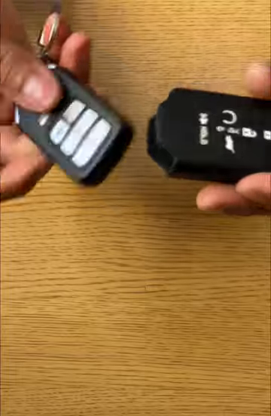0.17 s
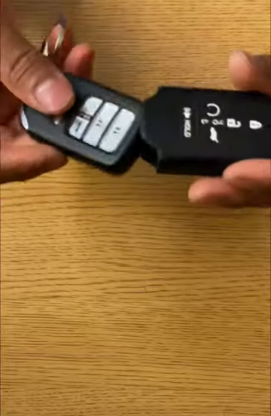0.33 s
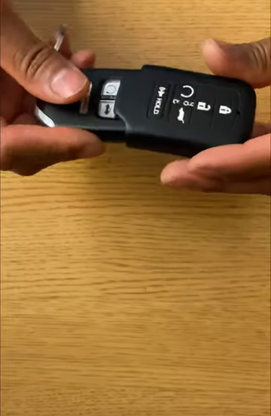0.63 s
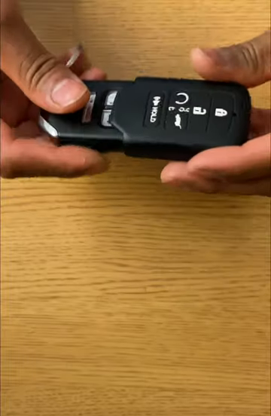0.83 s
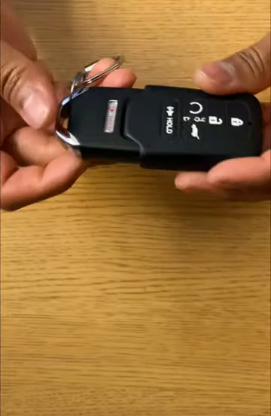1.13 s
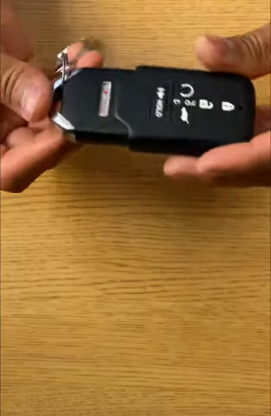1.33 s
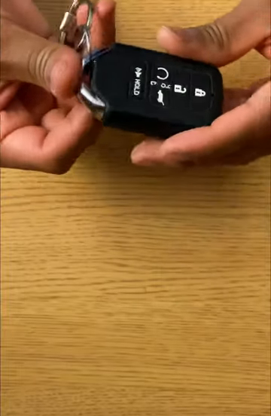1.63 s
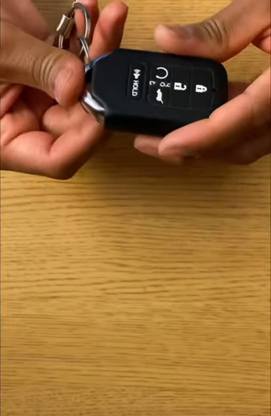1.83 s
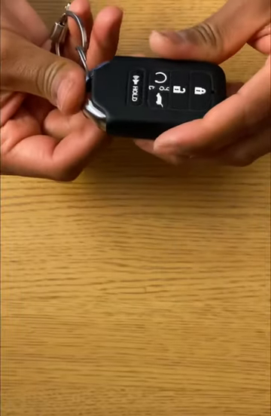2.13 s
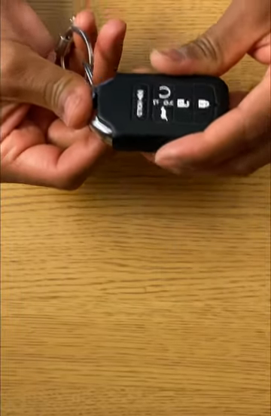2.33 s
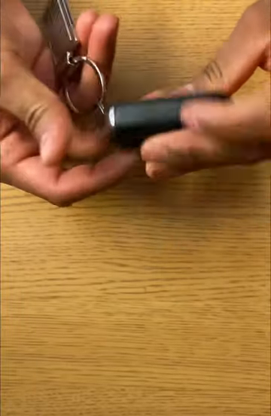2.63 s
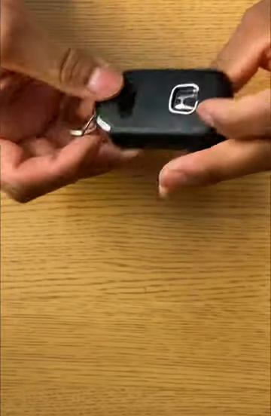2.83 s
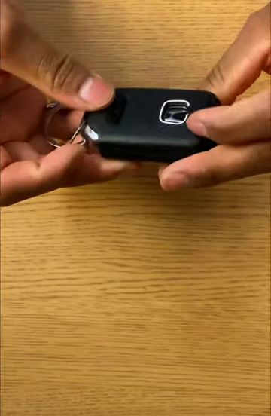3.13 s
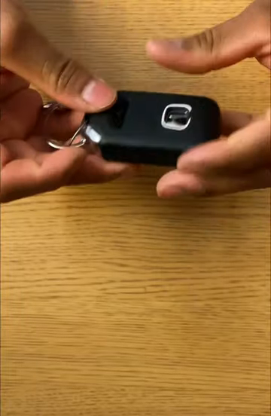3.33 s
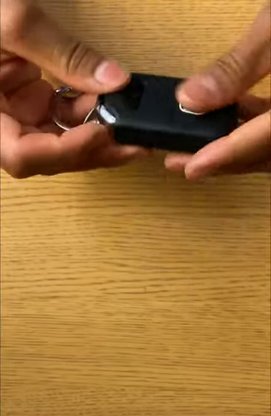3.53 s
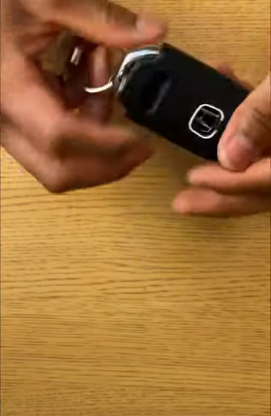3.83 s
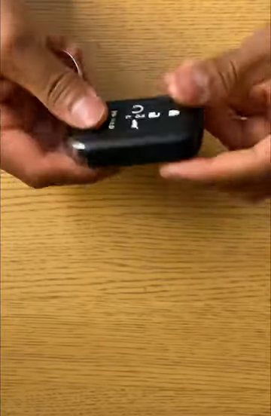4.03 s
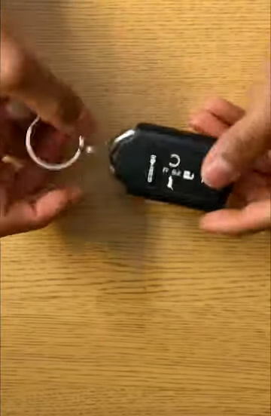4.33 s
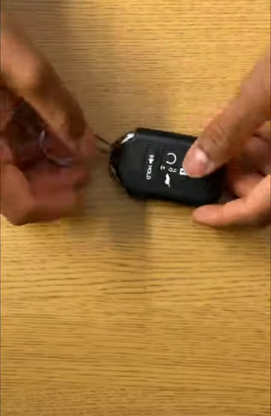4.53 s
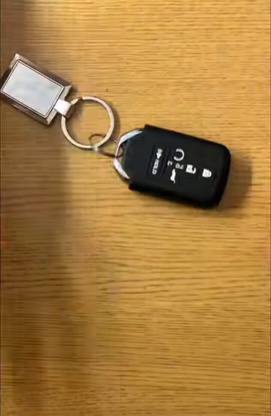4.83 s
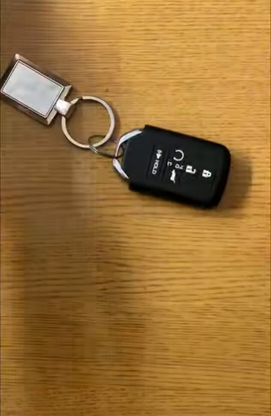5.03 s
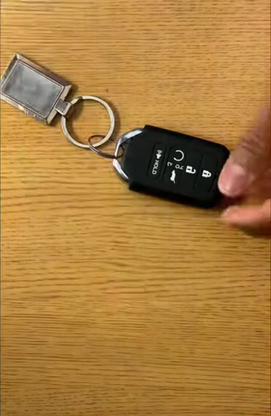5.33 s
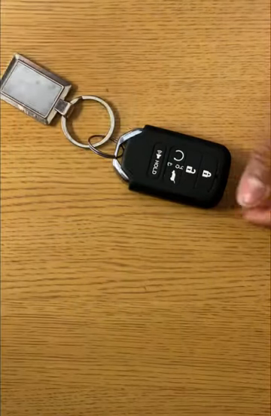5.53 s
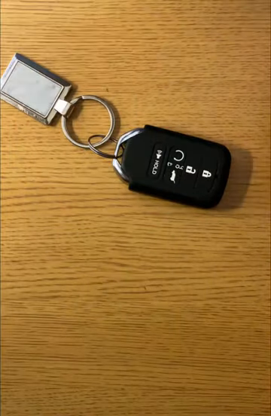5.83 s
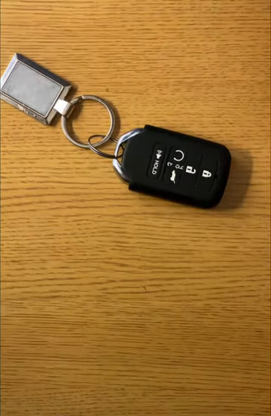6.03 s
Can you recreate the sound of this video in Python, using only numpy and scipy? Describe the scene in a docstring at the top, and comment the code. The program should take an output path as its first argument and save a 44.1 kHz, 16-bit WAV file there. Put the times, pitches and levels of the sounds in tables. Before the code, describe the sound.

Quiet, dry plastic rubbing and sharp clicks come first, with thin steel clinks damped by fingers. A soft thump and stronger clicks come as the case is turned over, then a loud double drop on a wooden tabletop, wood knock mixed with metallic rattle. Muffled table bumps and faint cloth hiss end it. Close stereo microphone, short indoor reverberation, low air hum.

```python
"""A key ring clinks and a plastic case clicks and squeaks as a key fob is pressed into it.
The fob and then its metal tag drop on a wooden table; hands bump the table and a sleeve brushes past.
Blows are shaped noise bursts, with sharp fronts or separate ringing modes; friction is grainy hiss.
Close sounds ring in a small room with a low ventilation hum, heard at two closely spaced microphone ports."""
import sys
import numpy as np
from scipy import signal
from scipy.fft import rfft, irfft, next_fast_len
from scipy.io import wavfile
from scipy.ndimage import uniform_filter1d

SR = 44100
rng = np.random.default_rng(int(sys.argv[2]) if len(sys.argv) > 2 else 0)


def transcribe(signal):
    """Save signal, clipped to [-1, 1], as a 16-bit WAV file at the path in sys.argv[1]."""
    frames = np.atleast_2d(signal).T
    limited = np.clip(frames, -1, 1)
    pcm = np.round(limited * 32767).astype(np.int16)
    wavfile.write(sys.argv[1], SR, pcm)


N = 272978

# modes of the metal tag with its ring: pitch_hz, level_db, t60_s
TAG = [(3230, -4, .05), (3620, -6, .05), (4194, -5, .06), (4450, -4, .05), (5200, -8, .05),
       (5551, -9, .055), (6200, -11, .05), (6679, -9, .06), (7154, 0, .052), (7245, 0, .048),
       (9500, -8, .035), (9800, -9, .035), (14550, -11, .06)]
# a landing or a hand thumps the table: start_s, thud_db, upper_corner_hz, lower_corner_hz, thud_t60_s,
# table_swing_db, swing_hz, swing_length_s, room_throb_db (relative to the swing)
TABLE_THUMPS = [(2.273, -26, 330, 75, .075, -19.5, 109.6, 0.04, -40),
                (2.305, -38.5, 360, 130, 0.088, -34, 104, 0.039, -35),
                (2.327, -39, 300, 75, 0.058, -29.5, 102, 0.036, -40),
                (4.426, -32.5, 422, 168.5, 0.11, -38, 104, 0.032, -31.5),
                (4.442, -29, 388.6, 110.3, 0.15, -17, 100.4, .054, -22.5),
                (4.57, -27.5, 296.5, 74.5, 0.11, -22.5, 113.7, 0.051, -39),
                (4.598, -27, 331.3, 90, 0.13, -11.5, 97.6, .056, -17.5),
                (4.643, -32, 200, 74, .1, -18.5, 100.7, .052, -34),
                (4.992, -46.5, 520, 240, .3, -65, 94.6, .05, -30),
                (5.047, -25.5, 318, 75, 0.14, -25, 86, 0.025, -17.5),
                (5.065, -22.5, 656, 110.7, 0.12, -26, 83, 0.052, -39.5),
                (5.08, -23, 280.7, 74.5, .07, -22.5, 92, .034, -32),
                (5.421, -30, 520, 110, 0.1, -36, 92, 0.042, -19),
                (5.433, -27.5, 303, 68, 0.11, -23.5, 100, .044, -21),
                (5.593, -41.5, 256, 75, 0.16, -41.5, 97.1, 0.039, -20.5),
                (5.851, -30, 190, 58, .12, -44, 88, 0.036, -22.5),
                (5.9, -34.5, 180, 62, 0.11, -26, 97.7, 0.051, -15.5)]


def case_clicks(level_db=-5, focus_db=1.32, note_width_hz=400):
    """Short plastic snaps, each strongest round the pitch of the edge that slips."""
    # snaps and ticks: start_s, level_db (before level_db above), centre_hz, hardness_db_per_octave,
    # note_db (typical boost at the centre)
    snaps = [(0.0582, -41.5, 4100, -1, 9), (0.155, -56.5, 2900, 2, 23), (.3626, -45, 2760, -4, 18),
             (0.3893, -51, 1950, -5, 15), (0.524, -50.5, 2000, -4.5, 12), (0.9766, -56.5, 2520, -3.5, 6),
             (1.0327, -50, 4050, 11, 1), (1.0534, -36, 5860, 0, 11), (1.0582, -33.5, 5980, -1, 12),
             (1.1707, -46, 2300, -3, 12), (1.32, -40, 2260, -3, 7), (1.337, -47, 3120, -2, 14),
             (1.4577, -49, 1940, -8, 14), (1.4807, -45, 3420, 0, -3), (2.2169, -49, 3810, -6.5, 16),
             (2.2663, -47, 970, -3, 7.5), (2.4825, -42.5, 4400, -4.5, -6), (2.630, -48, 3720, -2, 12),
             (2.6481, -37.5, 1280, 2, 6), (2.7113, -25.5, 6030, 0, 7), (2.745, -34.5, 1970, -5.5, -3),
             (2.773, -41, 2960, -0.5, 5), (3.282, -62, 5500, -3, 14), (3.2959, -51, 1460, 4, 8),
             (3.5882, -45.5, 1880, -0.5, 2), (3.707, -46.5, 1780, -6, 5), (3.8559, -33, 1900, -3, 4),
             (3.9635, -27.5, 1980, -1, 10), (4.0497, -37, 1985, 1.5, 8), (4.0614, -32.5, 1510, -5.5, 10),
             (4.1161, -31, 3100, -0.5, 3), (4.2255, -41, 2940, -1.5, 18.5), (5.004, -46.5, 1700, -1, 4),
             (5.0512, -25, 1500, -2, -1), (5.066, -33.5, 1705, -2, -4), (5.074, -29.5, 1260, -1.5, 12),
             (5.4118, -33.5, 1190, -6, 5), (5.422, -35, 1200, -5.5, 8), (5.852, -40.5, 3050, -2.5, 2),
             (6.0361, -36, 2136, -4.5, 6)]
    # dense resonances of the case: pitch_hz, level_db
    body = [(200, -23.5), (600, -5), (1200, -3), (2000, -11), (3000, -3), (4500, -6), (6500, -5),
            (8500, -12), (11000, -4.5), (15000, -19)]
    # damped resonances that stand out of it: pitch_hz, width_hz, typical_level_db
    body_peaks = [(1142, 150, -4), (1530, 234, 6), (1973, 240, 11.5), (2443, 710, 3.5), (2887, 130, 3.5),
                  (3910, 140, 7), (5500, 1300, 1)]
    t60_at_2k_s, damping = 0.034, 0.1  # higher edges die sooner, by this power of their pitch
    out = np.zeros((2, N))
    for s, db, centre, hard, note_db in snaps + faint_ticks():

        def colour(hz):
            away = octaves(hz, centre)
            plastic = read(body, hz) + peaks(body_peaks, hz)
            note = peaks([(centre, note_width_hz, note_db)], hz)
            return plastic + note + hard * away - focus_db * away ** 2

        t60 = t60_at_2k_s * (2000 / centre) ** damping
        add(out, s, amp(db + level_db) * snap(colour, t60, rise=0.00088, front_db=-4.5))
    return out


def faint_ticks(ticks_per_s=2.4, level_db=-54, scatter_db=-2, middle_hz=2330, spread_octaves=0.45):
    """Faint ticks of the case at random times, as rows like those of the snaps."""
    # spans of faint ticks: start_s, end_s (a span that ends before it starts gives none)
    spans = [(0.103, 1.93), (2.5, 2.3), (3.5, 4.4)]
    rows = []
    for start, end in spans:
        length = end - start
        for when, size, pitch in rng.random((round(length * ticks_per_s), 3)):
            db = level_db + scatter_db * (2 * size - 1)
            centre = middle_hz * 2 ** (spread_octaves * (2 * pitch - 1))
            rows.append((start + length * when, db, centre, 0, 8))
    return rows


def sliding(squeak_db=0, rub_db=4, slips_per_s=900, slip_scatter_db=3, squeak_width_hz=300):
    """Each push rubs the case, and a run of tiny slips rings one resonance that moves as the fob goes deeper."""
    # strokes of the fob: hardest_s, swell_s, ease_s, squeak_db, rub_db (before rub_db above),
    # first_pitch_hz, last_pitch_hz
    pushes = [(0.444, .04, 0.037, -64, -81, 2140, 1770), (.505, 0.023, 0.027, -65, -73, 1850, 1600),
              (.55, 0.029, 0.16, -74, -81, 1900, 1700), (0.884, 0.097, 0.066, -71, -77, 1700, 2020),
              (1.05, 0.029, 0.15, -86, -70, 2028, 2000), (1.22, .14, 0.66, -85, -74, 2200, 2190),
              (1.395, 0.1, 0.032, -67, -71.5, 2070, 1900), (1.462, 0.046, 0.085, -67, -63, 2180, 1460)]
    # hiss of the rubbing case: pitch_hz, level_db
    slide_tone = [(700, 11), (1400, 3.5), (2000, 13.5), (2600, 3.5), (4000, 8), (7000, -8), (11000, -15)]
    out, t = np.zeros((2, N)), np.arange(SR) / SR
    for top, swell, ease, db, hiss_db, first_hz, last_hz in pushes:
        slip_now = rng.random(SR) < slips_per_s / SR
        slips = slip_now * amp(slip_scatter_db * np.clip(rng.standard_normal(SR), -2, 2))
        # a low-pass in a frame that turns with the pitch acts as a gliding resonance
        glide_hz = np.interp(t, [0, swell + ease], [first_hz, last_hz])
        turn = np.exp(2j * np.pi * np.cumsum(glide_hz) / SR)
        low_pass = signal.butter(2, squeak_width_hz / 2, fs=SR)
        squeak = unit((turn * signal.lfilter(*low_pass, slips / turn)).real)
        scrape = rub(slide_tone, 0, grain_db=1.5, patchy_db=2.5)
        both = amp(db + squeak_db) * squeak + amp(hiss_db + rub_db) * scrape
        add(out, top - swell, stroke(swell, ease, edge_db=-12) * both)
    return out


def ring_clinks(level_db=-4, ring_db=-33, note_db=7, note_width_hz=450):
    """Bright steel ticks, each with its own note and a faint ring, damped by the fingers."""
    # the key ring touches the tag or the fob: start_s, level_db (before level_db above),
    # hardness_db_per_octave, strongest_pitch_hz
    touches = [(0.018, -41.5, 4.5, 7350), (0.058, -36.5, 2.5, 7030), (0.731, -61, 7, 6640),
               (1.054, -28, 24, 7900), (1.435, -46, 2, 6860), (1.63, -59, 1, 7160), (2.498, -36.5, 6, 7200),
               (2.531, -55, -1.5, 12000), (2.665, -49, 2, 7150), (2.687, -42, 6, 6750),
               (2.7331, -33.5, 4, 7900), (2.956, -57.5, 3, 6150), (3.506, -44, 8, 7600),
               (3.7717, -31, 3, 7090), (3.818, -53, -7.5, 5650), (3.9603, -39, 1, 6200),
               (3.9643, -27, 10.5, 6340), (4.02, -53.5, -6, 7340), (4.1062, -39.5, 4.5, 6520),
               (4.263, -52.5, -0.5, 7090), (4.27, -42, -0.5, 7220), (4.309, -43.5, 1, 14540),
               (4.372, -47.5, -3.5, 6280), (4.438, -35, 3, 11020), (4.456, -37, 9.5, 14130),
               (4.536, -26, -3, 9350), (4.799, -37.5, -7, 6230), (4.831, -39.5, -6, 8200),
               (4.883, -57, -1.5, 9500), (4.903, -46, -5, 6180), (4.911, -47, -9, 6840),
               (4.938, -59, 0.5, 7480), (5.031, -40, -2.5, 8340)]
    out = np.zeros((2, N))
    for s, db, hard, note_hz in touches:

        def colour(hz):
            note = peaks([(note_hz, note_width_hz, note_db)], hz)
            return steel(hz, humps=0.41) + hard * octaves(hz, 7000) + note

        tick = snap(colour, t60=0.033, rise=0.00016, front_db=-5.5)
        tag_ring = ring(TAG, scatter_db=1.5, detune=0.046)
        add(out, s, amp(db + level_db) * (tick + amp(ring_db) * tag_ring))
    return out


def landings(level_db=4.5, clash_db=-19.0, tag_db=-12, tag_room_db=-3, focus_db=9, note_db=6,
             note_width_hz=550, chatter_db=-16, chatter_s=0.024, loss_db=1.0, count=6):
    """Each landing cracks, rings table top and tag, then rebounds; gives direct sound and room share."""
    # fob and tag land: start_s, level_db (before level_db above), hardness_db_per_octave, edge_note_hz,
    # tag_db, table_ring_db, room_share_db (these three relative to the landing, before trims)
    drops = [(4.4235, -15.5, -2.5, 2900, -33.5, -16, 4), (4.437, -27, 0, 2468, -22.5, -17.5, 8.5),
             (4.4857, -32, -0.5, 3100, -31.5, -12.5, 7.5), (4.5599, -11, -1, 3600, -7, -14.5, -4.5),
             (4.5886, -18, -4.5, 3300, 1, -22, -0.5), (4.5953, -11.5, 1, 4400, -2.5, -13, -4),
             (4.5992, -19.5, 2, 5200, 4.5, -14, -4.5), (4.6132, -17.5, 2, 3150, -5, -24.5, -5.5),
             (4.619, -15.5, 3, 4350, -1.5, -16.5, -6.5), (4.635, -23.5, -1.5, 3300, 2.5, -14, -8),
             (4.644, -27.5, -1, 4300, -6, -17.5, -2), (4.667, -36, -3.5, 2500, -8.5, -17, -2)]
    # dense resonances of the wood: pitch_hz, level_db
    wood_tone = [(150, -27.5), (300, -12), (600, -1.5), (900, -5), (1400, -1), (2100, 4.5), (3200, 0.5),
                 (4400, -4.5), (5000, -5.5), (6500, -9.5), (8500, -19), (11000, -18), (13000, -29.5),
                 (15000, -34)]
    # separate modes of the table top: pitch_hz, level_db, t60_s
    top_modes = [(307.7, -5, 0.089), (320, -0.5, 0.11), (450, -3.5, .1), (604, -6, 0.15), (840, -19, 0.27),
                 (1143, -2.5, .035), (1201, 3.5, 0.044), (1636, -2, 0.083), (1966, -5.5, 0.055),
                 (2100, 2, 0.031), (2670, -1, 0.072), (2920, -4.5, 0.036), (3127, 0, 0.063)]
    out, sent = np.zeros((2, 2, N))
    for s, db, hard, note_hz, steel_db, top_db, room_db in drops:

        def colour(hz):
            note = peaks([(note_hz, note_width_hz, note_db)], hz)
            return read(wood_tone, hz) + hard * octaves(hz, 2000) + note

        def clash_colour(hz):
            return steel(hz, humps=0.9) - focus_db * octaves(hz, 5600) ** 2

        crack = burst(colour, t60=0.024, rise=0.00089)
        wood = crack + amp(top_db) * ring(top_modes, scatter_db=-0.5, rattle_db=0.5)
        clash = burst(clash_colour, t60=0.01, rise=0.0011)
        tag = amp(clash_db) * clash + amp(tag_db) * ring(TAG, scatter_db=2.5)
        add(out, s, amp(db + level_db) * (wood + amp(steel_db) * tag))
        add(sent, s, amp(db + level_db + room_db) * (wood + amp(steel_db + tag_room_db) * tag))
        # small rebounds at random gaps, each weaker by loss_db
        delays = np.cumsum(chatter_s * rng.uniform(0.18, 1, count))
        for k, delay in enumerate(delays):
            rebound = burst(colour, t60=0.013, rise=0.00052)
            add(out, s + delay, amp(db + chatter_db - k * loss_db) * rebound)
    return out, sent


def bumps(slope=7.34, push_db=-5, shudder_db=-2):
    """A soft contact pushes and shakes the table between two corner frequencies; then the weight settles."""
    yield_s = 0.003  # flesh gives way before the push arrives
    settle_s, settle_db, settle_hz = 0.016, 2, 163  # the weight follows the first contact, duller
    out = np.zeros((2, N))
    for s, db, first_corner, low_hz, t60, *_ in TABLE_THUMPS:
        for delay, extra_db, corner in [(0, 0, first_corner), (settle_s, settle_db, settle_hz)]:

            def colour(hz):
                upper = 1 + (hz / corner) ** slope
                lower = 1 + (low_hz / (hz + 1)) ** 10
                return -10 * np.log10(upper * lower)

            shudder = burst(colour, t60, rise=0.0025, spread=0.14)
            push = np.linalg.norm(shudder[0]) * pulse(colour)
            add(out, s + delay, amp(db + extra_db + shudder_db) * shudder)
            add(out, s + delay + yield_s, amp(db + extra_db + push_db) * push)
    return out


def booms(low_hz=92, beat_hz=15.0, t60=1.21, lead_s=0.0068):
    """The table's lowest swing swells and fades, leaving two room modes that beat as they die."""
    out = np.zeros((2, N))
    age = np.arange(SR) / SR
    pair = np.sin(2 * np.pi * low_hz * age) - np.sin(2 * np.pi * (low_hz + beat_hz) * age)
    throb = pair * np.exp(-np.log(1000) * age / t60)
    for s, *_, db, hz, swing_s, room_db in TABLE_THUMPS:
        start = s - lead_s  # the swing starts just ahead of the thud
        t = np.arange(int(swing_s * SR)) / SR
        swing = np.sin(np.pi * t / swing_s) ** 2 * np.sin(2 * np.pi * hz * t)
        add(out, start, amp(db) * swing)
        add(out, start + swing_s / 2, amp(db + room_db) * throb)
    return out


def sleeve(level_db=6.5):
    """Cloth brushes past in overlapping sweeps of grainy hiss."""
    # fastest_s, swell_s, ease_s, level_db (before level_db above), brightness_db_per_octave
    sweeps = [(5.381, 0.13, 0.19, -66.5, 4), (5.51, 0.097, 0.38, -66, 2.5), (5.82, 0.13, 0.34, -65, 5),
              (5.889, .07, 0.16, -55, -3), (6.05, 0.026, 0.13, -60, 0)]
    # hiss of the cloth: pitch_hz, level_db
    cloth_tone = [(500, 10.5), (1500, 0), (2900, 0), (4000, -3.5), (4800, -0.5), (7500, -11.5),
                  (10000, -18.5), (15000, -21)]
    out = np.zeros((2, N))
    for top, swell, ease, db, bright in sweeps:
        brush = rub(cloth_tone, bright, grain_db=-0.5, patchy_db=2.0)
        add(out, top - swell, amp(db + level_db) * stroke(swell, ease, edge_db=-16) * brush)
    return out


def changing_room(x, turn_s=0.41, count=3):
    """Crossfades between several random diffuse tails, so that no single tail colours every sound."""
    angle = np.pi * np.arange(N) / SR / turn_s
    gain = np.sqrt(2 / count)  # keeps the summed power steady
    return sum(room(x * gain * np.cos(angle + np.pi * k / count)) for k in range(count))


def room(x, gap_s=0.001, build_s=0.00053):
    """A diffuse tail after a short gap, each band dying at its own speed."""
    # decay of the room: pitch_hz, t60_s
    decay = [(100, 0.78), (300, 0.21), (700, 0.4), (2000, 0.51), (5000, 0.4), (8000, 0.3), (15000, 0.34)]
    # strength of the tail: pitch_hz, level_db
    strength = [(100, -5.5), (300, -5), (700, 0), (1200, -5), (2000, -7.5), (5000, -9), (9000, -8),
                (15000, -21.5)]
    hz, t, z = signal.stft(noise(np.zeros_like, SR), SR, nperseg=256)
    t60 = read(decay, hz)[:, None]
    even_energy = np.sqrt(2 * np.log(1000) / (t60 * SR))  # long and short decays carry the same energy
    z = z * np.exp(-np.log(1000) * t / t60) * amp(read(strength, hz))[:, None] * even_energy
    tail = signal.istft(z, SR, nperseg=256)[1]
    tail = tail * np.clip((np.arange(tail.shape[1]) / SR - gap_s) / build_s, 0, 1)
    return signal.fftconvolve(x.mean(0)[None], tail, axes=1)[:, :N]


def ventilation(air_db=-54, waver=1.0):
    """A steady rush of air with motor lines whose phase wavers by about waver radians."""
    # rush of air: pitch_hz, level_db (relative)
    air_tone = [(25, -15.5), (45, -10), (65, 0), (110, -8), (150, -9), (250, -16.5), (450, -19), (700, -32),
                (1200, -39.5), (2300, -49.5), (3400, -38.5), (4800, -56), (7200, -56), (16000, -66)]
    # motor lines: pitch_hz, level_db
    motor_lines = [(60, -56), (66, -65), (118.4, -60), (241, -71), (398.4, -74.5), (468.3, -73.5)]
    t = np.arange(N) / SR
    knots = np.linspace(0, N / SR, 30)
    hum = np.zeros(N)
    for hz, db in motor_lines:
        drift = np.interp(t, knots, rng.standard_normal(len(knots)))
        hum += amp(db) * unit(np.sin(2 * np.pi * hz * t + waver * drift))
    return amp(air_db) * noise(lambda hz: read(air_tone, hz), N) + hum


def snap(colour, t60, rise, front_db):
    """A sharp front, its reflections off hand and table, and the crowded ringing that follows."""
    # direct front, then off the table and the hand: delay_s (before a random stretch), level_db
    paths = [(.0005, 0), (.0034, -6), (.005, -9)]
    out = burst(colour, t60, rise)
    size = np.linalg.norm(out[0])
    front = size * amp(front_db) * pulse(colour)
    reach = rng.uniform(0.8, 1.2)
    for delay, db in paths:
        add(out, delay * reach, amp(db) * front)
    return out * size / np.linalg.norm(out[0])


def pulse(colour, size=4096):
    """The first wavefront of a blow: one causal pulse of energy 1 with the dB spectrum colour(hz)."""
    db = colour(abs(np.fft.fftfreq(size, 1 / SR)))
    log_gain = np.log(amp(np.maximum(db - db.max(), -100)))
    # the Hilbert transform of the log gain gives the minimum phase
    wave = np.fft.ifft(np.exp(np.conj(signal.hilbert(log_gain)))).real
    return wave / np.linalg.norm(wave)


def burst(colour, t60, rise, spread=1.0):
    """A blow on many crowded resonances that die together."""
    t = np.arange(SR // 3) / SR
    shape = (1 - np.exp(-t / rise)) * np.exp(-np.log(1000) * t / t60)
    return unit(noise(colour, len(t), spread) * shape) * np.sqrt(np.mean(shape ** 2))


def ring(modes, scatter_db=4.0, detune=0.0034, rattle_db=5.0):
    """Separate modes, weighted and detuned by each way of resting; loose contact makes each one flutter."""
    t = np.arange(SR // 3) / SR
    hz, db, t60 = np.transpose(modes)[:, :, None]
    weight, turn, shift = rng.standard_normal((3, len(modes), 1))
    wobble = unit(uniform_filter1d(rng.standard_normal((len(modes), len(t))), size=180))
    flutter = unit(amp(rattle_db * wobble))
    waves = np.sign(turn) * flutter * np.sin(2 * np.pi * hz * (1 + detune * shift) * t)
    decay = np.exp(-np.log(1000) * t / t60)
    return (amp(db + scatter_db * weight) * decay * waves).sum(0)


def steel(hz, humps):
    """The dB spectrum of a contact on the key ring or its tag; fingers flatten its humps."""
    # dense resonances of the steel: pitch_hz, level_db
    steel_tone = [(500, -17.5), (1500, -6.5), (3000, -4), (5000, -7.5), (7300, -6.5), (8600, -11),
                  (10300, -8.5), (12500, -6), (15000, -9.5)]
    # resonances that stand out: pitch_hz, width_hz, level_db (before the humps factor)
    steel_peaks = [(5230, 1200, 8.3), (7200, 310, 16), (7760, 250, 5.1), (9350, 650, 4.5), (13080, 700, 4),
                   (13600, 500, 4.7)]
    return read(steel_tone, hz) + humps * peaks(steel_peaks, hz)


def peaks(table, hz, scatter=0.31):
    """Resonance humps in dB; each point of contact brings them out differently."""
    centre, width, db = np.transpose(table)[:, :, None]
    height = db * (1 + scatter * rng.standard_normal(db.shape))
    return (height / (1 + (2 * (hz - centre) / width) ** 2)).sum(0)


def rub(tone, bright, grain_db, patchy_db):
    """One second of friction: a hiss that catches every few milliseconds, in patches of changing colour."""
    hiss = noise(lambda hz: read(tone, hz) + bright * octaves(hz, 3000), SR)
    z = signal.stft(hiss, nperseg=256)[2]
    patches = uniform_filter1d(rng.standard_normal(z.shape[1:]), size=6, axis=0)
    patches = unit(uniform_filter1d(patches, size=7, axis=1))
    patchy = signal.istft(z * amp(patchy_db * patches), nperseg=256)[1][:, :SR]
    grain = unit(uniform_filter1d(rng.standard_normal(SR), size=120))
    return unit(patchy * amp(grain_db * grain))


def stroke(swell_s, ease_s, edge_db, fade_s=0.0074):
    """Gain over one second from the start of a movement: it swells to its top, then eases off."""
    t, end = np.arange(SR) / SR, swell_s + ease_s
    swell = amp(np.interp(t, [0, swell_s, end], [edge_db, 0, edge_db]))
    return swell * np.clip(np.minimum(t, end - t) / fade_s, 0, 1)


def noise(colour, size, spread=1):
    """Two-port noise whose dB spectrum is colour(hz); spread 0 is the same in both ports."""
    # diffuse sound at the two ports: pitch_hz, likeness (1 = identical)
    port_likeness = [(150, 1), (300, .92), (650, .5), (1200, .9), (3100, .85), (4400, .8), (4900, .98),
                     (5400, .8), (7000, .65), (12000, .97)]
    padded = next_fast_len(size)
    hz = np.fft.rfftfreq(padded, 1 / SR)
    a, b = rfft(rng.standard_normal((2, padded)))
    same = np.clip(1 - spread * (1 - read(port_likeness, hz)), 0, 1)
    ports = np.array([a, same * a + np.sqrt(1 - same ** 2) * b])
    return unit(irfft(ports * amp(colour(hz)), padded)[:, :size])


def amp(db):
    """Decibels to gain."""
    return 10 ** (np.asarray(db) / 20)


def unit(x):
    """Scales to rms 1."""
    return x / np.sqrt(np.mean(x ** 2) + 1e-20)


def read(points, hz):
    """Reads a table on a log-frequency axis."""
    f, value = np.transpose(points)
    return np.interp(np.log(hz + 1), np.log(f + 1), value)


def octaves(hz, centre):
    """Distance from a centre frequency in octaves, flat in the deep bass."""
    return np.log2(np.maximum(hz, 300) / centre)


def add(mix, s, sound):
    """Mixes a sound in at time s."""
    part = mix[:, round(s * SR):][:, :sound.shape[-1]]
    part += sound[..., :part.shape[1]]


def scene():
    """Case, key ring, table and sleeve are close; all blows and the sliding also send a share into the room."""
    plastic = case_clicks() + sliding()
    clinks = ring_clinks()
    dropped, sent = landings()
    bumped = bumps()
    echoes = changing_room(amp(-4.5) * plastic + clinks + sent + amp(-6.5) * bumped)
    return plastic + clinks + dropped + bumped + booms() + sleeve() + echoes + ventilation()


def record(dry, low_cut_hz=44, edge_hz=16200):
    """The two ports hear each frequency with a phase difference; then the low cut and the band limit."""
    # between the two ports: pitch_hz, left_lead_radians
    port_phase = [(200, 0), (750, -.45), (1200, 0), (1800, .1), (2650, 1.1), (3600, .3), (4500, 1),
                  (4900, 3), (5300, 6.2), (8500, 8.2), (11500, 9.3), (16000, 9.42)]
    size = next_fast_len(N + SR // 10)
    hz = np.fft.rfftfreq(size, 1 / SR)
    lead = read(port_phase, hz)
    low_cut = 1 / np.sqrt(1 + (low_cut_hz / (hz + 1)) ** 10)
    turn = np.exp(0.5j * np.array([lead, -lead]))
    ports = irfft(rfft(dry, size) * low_cut * turn, size)[:, :N]
    band_limit = signal.firwin(511, edge_hz, window=("kaiser", 9), fs=SR)
    return signal.oaconvolve(ports, band_limit[None], "same")


dry = scene()
out = record(dry)
transcribe(out)
```